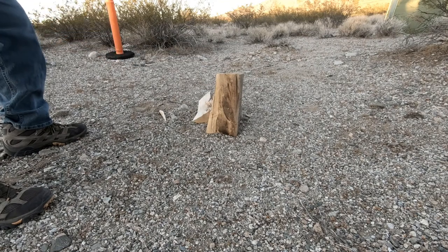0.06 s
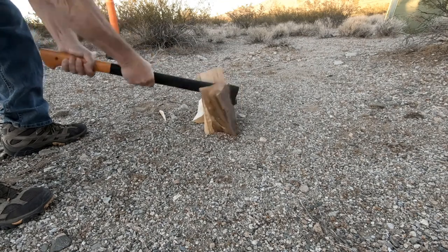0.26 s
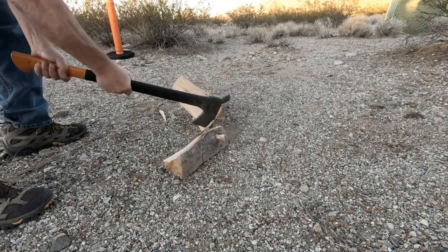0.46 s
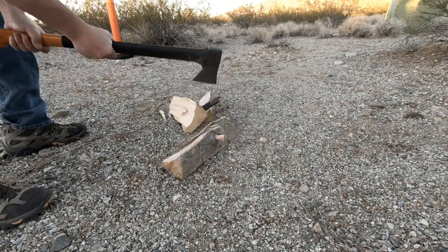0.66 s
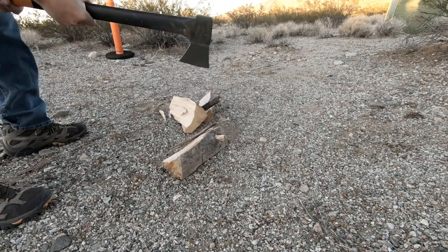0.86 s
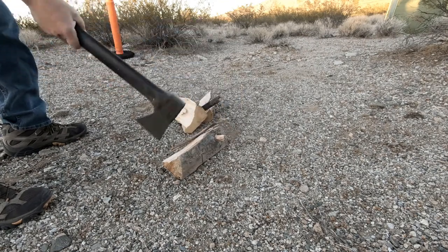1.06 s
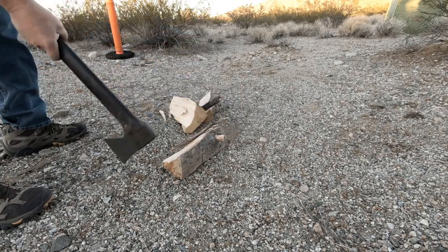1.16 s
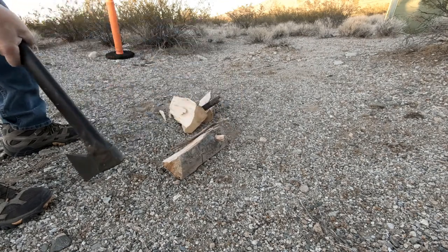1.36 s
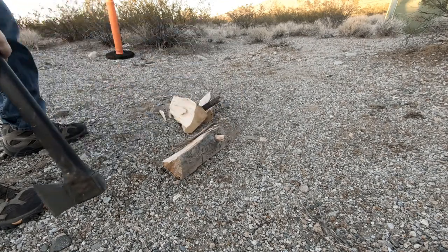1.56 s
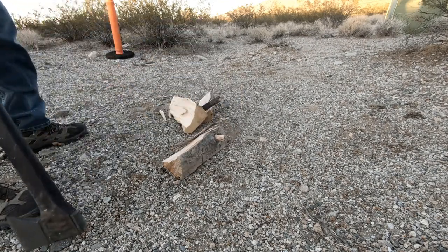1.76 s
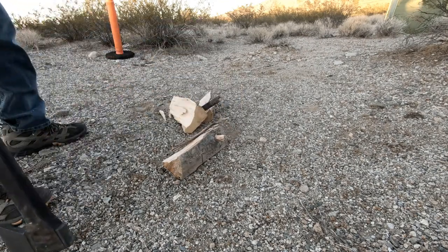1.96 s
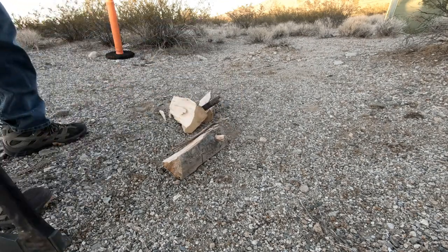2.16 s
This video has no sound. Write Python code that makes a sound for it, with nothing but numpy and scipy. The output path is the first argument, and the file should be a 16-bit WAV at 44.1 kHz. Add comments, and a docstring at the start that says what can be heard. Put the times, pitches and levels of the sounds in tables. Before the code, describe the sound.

An axe splits a short log with one loud sharp crack, and the halves clatter onto gravel

```python
"""An axe splits a short log on gravel: bursts of cracks excite log resonances, struck sines knock and ring.
The halves tumble and slide: bursts through wood resonances, hollow notes, grains and ticking stones.
The lowered handle knocks and the head clinks on a stone; shoes scuff, pebbles tick and cloth swishes.
Behind them are filtered-noise wind rumble, a faint hiss of air and one brief low hum.
"""
import sys
import numpy as np
from scipy import signal
from scipy.fft import rfft, irfft
from scipy.io import wavfile

SR = 44100
rng = np.random.default_rng(int(sys.argv[2]) if len(sys.argv) > 2 else 0)


def generate_wav(signal):
    """Clip the signal to [-1, 1] and save it as 16-bit WAV at the path in sys.argv[1]."""
    frames = np.transpose(np.atleast_2d(signal))
    scaled = np.clip(frames, -1, 1) * 32767
    pcm = np.round(scaled).astype(np.int16)
    wavfile.write(sys.argv[1], SR, pcm)


N = 97020
T = np.arange(N) / SR


def from_db(db):
    """Amplitude ratio of a level in dB."""
    return 10 ** (np.asarray(db) / 20)


def rms_one(x):
    """Scale to unit rms."""
    return x / np.sqrt(np.mean(x ** 2) + 1e-20)


def in_time(rows):
    """Gain curves, linear in dB between rows of (time [s], level [dB], ..)."""
    time_s, *columns_db = np.transpose(rows)
    return [from_db(np.interp(T, time_s, column_db)) for column_db in columns_db]


def response(points, size=8192):
    """Minimum-phase impulse response with a spectrum of (frequency [Hz], level [dB])."""
    hz, db = np.transpose(points)
    bins_hz = np.maximum(np.fft.rfftfreq(size, 1 / SR), 1)
    magnitude = from_db(np.interp(np.log(bins_hz), np.log(hz), db))
    cepstrum = irfft(np.log(magnitude))
    # fold the cepstrum to its causal half
    cepstrum[1:size // 2] *= 2
    cepstrum[size // 2 + 1:] = 0
    return irfft(np.exp(rfft(cepstrum)))[:size // 2]


def through(x, h):
    """Filter by an impulse response of unit energy, which keeps the power of white noise."""
    return signal.fftconvolve(x, h / np.linalg.norm(h))[:N]


def colour(x, points):
    """Shape the spectrum; it drops 21.5 dB in the octave below the first point."""
    hz, db = points[0]
    return through(x, response([(hz / 2, db - 21.5), *points]))


def resonate(x, peaks, size=4096):
    """Parallel damped modes of (frequency [Hz], width [Hz], relative level [dB]), alternating in sign."""
    t = T[:size]
    h = 0
    for k, (hz, width_hz, db) in enumerate(peaks):
        decay = np.exp(-np.pi * width_hz * t)
        h = h + (-1) ** k * from_db(db) * width_hz * decay * np.cos(2 * np.pi * hz * t)
    return through(x, h)


def decay_db(age_s, t60_s):
    """Level falling 60 dB per t60, down to -200 dB."""
    return -np.minimum(60 * age_s / t60_s, 200)


def ring(start_s, hz, t60_s, db):
    """A struck mode: a sine dying exponentially."""
    age_s = np.maximum(T - start_s, 0)
    return from_db(db + decay_db(age_s, t60_s)) * np.sin(2 * np.pi * hz * age_s)


def grains(grain_db):
    """Dense tiny clicks of random sign and uneven size; rms 1."""
    signs = rng.choice([-1, 1], N)
    return rms_one(signs * from_db(grain_db * np.minimum(rng.exponential(1, N), 6)))


def burst(start_s, db, length_s, t60_s, grain_db=2):
    """A crush of micro-fractures that holds for its length and dies."""
    age_s = np.maximum(T - start_s - length_s, 0)
    shape = (T >= start_s) * from_db(decay_db(age_s, t60_s))
    crush = shape * grains(grain_db)
    # energy is set by the shape, not by the draw
    return from_db(db) * crush * np.linalg.norm(shape) / np.linalg.norm(crush)


def drift(knots_per_s):
    """Random wander: straight lines between normal knots of spread 1."""
    knots = rng.standard_normal(2000)
    return np.interp(T * knots_per_s, np.arange(len(knots)), knots)


def snaps(rate_per_s):
    """Separate clicks at random moments; rms 1."""
    return rms_one((rng.random(N) < rate_per_s / SR) * rng.uniform(-1, 1, N))


STONES_PER_S, STONE_WIDTH_SHARE = 160, 0.094   # mode width as a share of its frequency


def stones(range_hz, count=10):
    """Stones of different sizes tick at random, each size with its own mode; rms 1."""
    ticks = 0
    for hz in np.geomspace(*range_hz, count):
        ticks = ticks + resonate(snaps(STONES_PER_S / count), [(hz, hz * STONE_WIDTH_SHARE, 0)])
    return rms_one(ticks)


def swell(start_s, length_s, first_hz, last_hz, width_hz, db):
    """A narrow noise band, two drifts on quadrature carriers, that rises, glides and fades."""
    along = np.clip((T - start_s) / length_s, 0, 1)
    phase = 2 * np.pi * np.cumsum(first_hz + (last_hz - first_hz) * along) / SR
    band = drift(width_hz) * np.cos(phase) + drift(width_hz) * np.sin(phase)
    return from_db(db) * np.sin(np.pi * along) * band


# wind spectrum: (frequency [Hz], relative level [dB])
WIND_COLOUR = [(25, -1.5), (70, -4.5), (150, -9.5), (600, -39.5)]
WIND_DB, WIND_GUST_DB, WIND_SIDE_DB = -54.5, -2, -3   # side: relative to mid


def wind():
    """Turbulence rumbles on the microphone: low-passed stereo noise with a drifting level."""
    rumble = stereo_noise(WIND_COLOUR, WIND_SIDE_DB)
    rumble = signal.sosfilt(signal.butter(2, 400, fs=SR, output="sos"), rumble)
    return from_db(WIND_DB + WIND_GUST_DB * drift(4.8)) * rumble


# open-air hiss spectrum: (frequency [Hz], relative level [dB])
AIR_COLOUR = [(300, -3), (650, -11), (15500, -27.5)]
AIR_DB, AIR_SIDE_DB = -67, -0.5


def air():
    """Faint steady hiss: coloured stereo noise."""
    return from_db(AIR_DB) * stereo_noise(AIR_COLOUR, AIR_SIDE_DB)


def stereo_noise(points, side_db):
    """Coloured mid noise plus independent side noise of opposite sign at each ear."""
    mid = colour(rng.standard_normal(N), points)
    side = colour(rng.standard_normal(N), points)
    return mid + from_db(side_db) * side * [[1], [-1]]


HUM_START_S, HUM_LENGTH_S, HUM_HZ, HUM_WIDTH_HZ, HUM_DB = 1.164, 0.18, 78, 24.04, -52


def hum():
    """A low narrow noise band swells briefly."""
    return swell(HUM_START_S, HUM_LENGTH_S, HUM_HZ, HUM_HZ, HUM_WIDTH_HZ, HUM_DB)


# sole scuffs: (time [s], length [s], first frequency [Hz], last frequency [Hz], level [dB])
SCUFFS = [(1.74, 0.084, 1478, 1418, -56), (1.78, 0.0587, 821, 599, -52.5)]
SCUFF_WIDTH_HZ = 180


def scuffs():
    """The sole scuffs: gliding narrow noise bands."""
    return sum(swell(start_s, length_s, first_hz, last_hz, SCUFF_WIDTH_HZ, db)
               for start_s, length_s, first_hz, last_hz, db in SCUFFS)


# pebbles shifting underfoot: (time [s], level [dB], frequency [Hz])
PEBBLES = [(1.4103, -47, 1367), (1.441, -53.5, 1002), (1.544, -48, 3698), (1.704, -52.5, 1502),
           (1.7725, -39, 1397)]
PEBBLE_WIDTH_HZ, PEBBLE_CLICK_DB, PEBBLE_BAND_HZ = 660, -10, (770, 5600)
UNDERFOOT_RANGE_HZ, UNDERFOOT_DB = (700, 3500), -5.5   # grinding stones, relative to the rubbing


def pebbles(rub):
    """Stones grind with the rubbing shoe; single pebbles tick, each with one broad mode."""
    ticking = from_db(UNDERFOOT_DB) * rub * stones(UNDERFOOT_RANGE_HZ)
    for start_s, db, hz in PEBBLES:
        tick = burst(start_s, db, length_s=0.00054, t60_s=0.014)
        ticking = ticking + from_db(PEBBLE_CLICK_DB) * tick + resonate(tick, [(hz, PEBBLE_WIDTH_HZ, 0)])
    return signal.sosfilt(signal.butter(2, PEBBLE_BAND_HZ, "band", fs=SR, output="sos"), ticking)


# shoes and clothes moving: (time [s], rubbing level [dB], swish level [dB])
MOVING = [(0, -76, -81), (.23, -68.5, -64.5), (.3, -81, -85), (1.17, -73.5, -71.5), (1.187, -56, -85),
          (1.24, -74.5, -70.5), (1.6, -73, -80), (1.79, -58.5, -69), (1.91, -61.5, -75), (2.04, -79, -67.5),
          (2.11, -66, -46), (2.16, -47.5, -47.5), (2.2, -57.5, -53)]
# rubbing spectrum: (frequency [Hz], relative level [dB])
RUB_COLOUR = [(100, -7), (750, .5), (1500, -2.5), (2500, -10.5), (15000, -43.5)]
# cloth spectrum: (frequency [Hz], relative level [dB])
SWISH_COLOUR = [(500, -27), (4500, 3), (11000, -8.5), (15500, -20)]


def stance():
    """A shoe rubs and scuffs, pebbles tick and cloth swishes: grains follow the motion."""
    rub, swish = in_time(MOVING)
    shoe = colour(rub * grains(3.6), RUB_COLOUR)
    cloth = colour(swish * grains(3.0), SWISH_COLOUR)
    return scuffs() + pebbles(rub) + shoe + cloth


# handle modes: (frequency [Hz], relative level [dB], t60 [s])
HANDLE = [(1875, -1.5, 0.17), (1990, -7, 0.15), (2390, 0.5, 0.067), (3544, -5, 0.086)]
# handle knock spectrum: (frequency [Hz], relative level [dB])
HANDLE_COLOUR = [(260, -10), (500, -8), (1400, -23.5), (1900, -9), (4200, -10), (12000, -52.5)]
HANDLE_START_S, HANDLE_LENGTH_S, HANDLE_DB, HANDLE_RING_DB = 1.3168, 0.0089, -39, -41


def handle_knock():
    """The hollow handle knocks: a coloured burst plus dying sines."""
    knock = colour(burst(HANDLE_START_S, HANDLE_DB, HANDLE_LENGTH_S, t60_s=0.046), HANDLE_COLOUR)
    for hz, db, t60_s in HANDLE:
        start_s = HANDLE_START_S + HANDLE_LENGTH_S * rng.random() / 2
        knock = knock + ring(start_s, hz, t60_s, HANDLE_RING_DB + db)
    return knock


# steel on stone: (time [s], level [dB])
CLINKS = [(1.8563, -32.5), (1.8722, -48)]
# contact spectrum: (frequency [Hz], relative level [dB])
CLINK_COLOUR = [(1700, -22), (2600, -1.5), (7000, 7.5), (9000, -11), (12500, -3.5), (15500, -33)]
# axe head modes: (frequency [Hz], level relative to the clink [dB], t60 [s])
HEAD = [(2394, -12.5, 0.1), (6140, -13, .22), (6710, -19, .22), (7880, 4.5, 0.046), (10530, -7.5, 0.048),
        (12740, -11, 0.05)]
CLINK_TAIL_DB, CLINK_TAIL_T60_S = -13.5, 0.21


def head_clinks():
    """The head clinks on a stone and bounces once: coloured ticks excite steel modes."""
    ticks, modes = 0, 0
    for start_s, db in CLINKS:
        ticks = ticks + burst(start_s, db, length_s=0.0028, t60_s=0.023, grain_db=5)
        ticks = ticks + burst(start_s, db + CLINK_TAIL_DB, 0, CLINK_TAIL_T60_S)
        modes = modes + sum(ring(start_s, hz, t60_s, db + mode_db) for hz, mode_db, t60_s in HEAD)
    return colour(ticks, CLINK_COLOUR) + modes


# halves hitting gravel:
# (time [s], clack level [dB], length [s], grit level [dB], hollow note [Hz], note level [dB])
LANDINGS = [(0.4323, -20.5, .0055, -27.5, 268, -34.5), (0.4707, -37.5, 0.0042, -48, 1630, -34),
            (.512, -41.5, .004, -66.5, 1640, -39.5), (0.5432, -36.5, 0.0033, -43, 1060, -46),
            (0.5955, -30.5, 0.0037, -31, 1150, -22.5), (0.639, -43.5, .003, -67, 1150, -35),
            (.694, -40, 0.0045, -38.5, 1146, -34.5), (0.7138, -42, 0.0049, -45, 642, -28.5)]
# split-half resonances: (frequency [Hz], width [Hz], relative level [dB])
HALF = [(1280, 200, -5.5), (1780, 250, 0.5), (2210, 320, -1.5), (3010, 355, 1.5), (3460, 220, 2),
        (4515, 290, -1.5), (6220, 250, -5.5), (7870, 300, -10.5)]
# ground thud spectrum: (frequency [Hz], relative level [dB])
THUD_COLOUR = [(180, 1), (450, 1), (2000, -12), (8000, -51)]
# crunched and sliding grit spectrum: (frequency [Hz], relative level [dB])
GRIT_COLOUR = [(300, -22.5), (2500, -2.5), (5500, 2), (12000, -11), (15500, -20)]
LANDING_T60_S, NOTE_T60_S, THUD_T60_S = 0.027, 0.028, 0.075
OVERTONE_DB, THUD_DB = -6.5, -19.5   # relative to the note


def landings():
    """The halves clack through wood modes, sound hollow notes, thud on the ground and crunch grit."""
    clacks, grit, notes, thuds = 0, 0, 0, 0
    for start_s, db, length_s, grit_db, hz, note_db in LANDINGS:
        clacks = clacks + burst(start_s, db, length_s, LANDING_T60_S)
        grit = grit + burst(start_s + length_s / 2, grit_db, length_s / 2, LANDING_T60_S)
        notes = notes + ring(start_s, hz, NOTE_T60_S, note_db)
        notes = notes + ring(start_s, 2 * hz, NOTE_T60_S, note_db + OVERTONE_DB)
        thuds = thuds + burst(start_s, note_db + THUD_DB, length_s, THUD_T60_S)
    return resonate(clacks, HALF) + notes + colour(thuds, THUD_COLOUR) + colour(grit, GRIT_COLOUR)


# sliding on gravel: (time [s], wood scrape level [dB], grit level [dB])
SLIDE = [(.35, -85, -81), (.39, -58, -58.5), (.43, -51.5, -60.5), (.455, -42, -51.5), (.535, -44.5, -60),
         (.565, -59, -58), (.59, -51.5, -62), (.62, -48.5, -60.5), (.68, -45.5, -48.5), (.73, -52.5, -55.5),
         (.77, -64.5, -62.5), (.82, -73.5, -70), (1.0, -75.5, -66.5), (1.15, -86.5, -83.5)]
# wood scrape spectrum: (frequency [Hz], relative level [dB])
SCRAPE_COLOUR = [(200, -24.5), (800, -21.5), (1150, -8.5), (1700, 1), (3200, -4), (5000, -18.5),
                 (9000, -29)]
SLIDE_GRAIN_DB, SLIDE_ROUGH_DB, SLIDE_ROUGH_PER_S = 4.5, 4.5, 220
FLICKED_RANGE_HZ, FLICKED_DB = (1410, 8000), -2   # flicked stones, relative to the grit


def slide():
    """Wood scrapes and grit crunches as rough grains; single stones are flicked."""
    scrape_gain, grit_gain = in_time(SLIDE)
    scrape = scrape_gain * grains(SLIDE_GRAIN_DB) * from_db(SLIDE_ROUGH_DB * drift(SLIDE_ROUGH_PER_S))
    grit = grit_gain * grains(SLIDE_GRAIN_DB) * from_db(SLIDE_ROUGH_DB * drift(SLIDE_ROUGH_PER_S))
    flick_gain = grit_gain * from_db(FLICKED_DB + SLIDE_ROUGH_DB * drift(STONES_PER_S / 2))
    flicked = flick_gain * stones(FLICKED_RANGE_HZ)
    return flicked + colour(scrape, SCRAPE_COLOUR) + colour(grit, GRIT_COLOUR)


# splinters and chips snapping: (time [s], level [dB])
SPLINTERS = [(.2793, -25), (0.286, -30), (.3, -46), (0.316, -38.5), (.336, -38.5), (.376, -44.5),
             (0.4896, -37.5), (.5695, -40), (0.581, -49), (0.625, -49), (.672, -53), (.848, -47)]
# splinter spectrum: (frequency [Hz], relative level [dB])
SPLINTER_COLOUR = [(600, -20.5), (3200, -7.5), (4800, 0), (9000, -4.5), (15500, -13.5)]
SPLINTER_LENGTH_S, SPLINTER_T60_S = 0.0017, 0.022


def splinters():
    """Splinters snap: short coloured bursts."""
    bursts = sum(burst(start_s, db, SPLINTER_LENGTH_S, SPLINTER_T60_S) for start_s, db in SPLINTERS)
    return colour(bursts, SPLINTER_COLOUR)


# whole log knocking under the blade: (time [s], frequency [Hz], t60 [s], level [dB])
BLOWS = [(.2442, 1055, 0.022, -1), (.2445, 590, .02, -10.5), (.2438, 260, 0.044, -22),
         (.2525, 128, .028, -7), (.254, 102, 0.12, -36)]
THUMP_LOW_CUT_HZ = 29


def log_knock():
    """Log and ground thump under the blade: high-passed dying sines."""
    low_cut = signal.butter(2, THUMP_LOW_CUT_HZ, "high", fs=SR, output="sos")
    return signal.sosfilt(low_cut, sum(ring(*row) for row in BLOWS))


# wood cracking open: (time [s], level [dB], length [s])
CRACKS = [(0.242, -9, 0.0039), (0.2444, -4.5, 0.0063), (0.254, -12, .0013), (0.2608, -10, 0.001),
          (0.266, -15.5, 0.0056), (0.2727, -10, 0.0014)]
# torn wood spectrum: (frequency [Hz], relative level [dB])
CRACK_COLOUR = [(300, -14.5), (1250, -10.5), (1500, -0.5), (3200, -2), (10000, -7), (15500, -20.5)]
# log resonances: (frequency [Hz], width [Hz], relative level [dB])
LOG = [(1478, 62, -3.5), (3005, 230, 3.5), (4580, 140, -3.5), (6090, 190, 1), (7870, 260, -8),
       (10060, 130, -9.5), (13300, 240, -12.5)]
CRACK_T60_S, CRACK_GRAIN_DB, LOG_DB, TEAR_DB = 0.015, 2, -4, -2.5
FIBRES_START_S, FIBRES_PER_S, FIBRES_DB, FIBRES_T60_S = 0.276, 400, -26, 0.13


def tearing_wood():
    """Cracks, then the last fibres parting one by one, drive log modes and a broad tear."""
    cracks = sum(burst(start_s, db, length_s, CRACK_T60_S, CRACK_GRAIN_DB)
                 for start_s, db, length_s in CRACKS)
    fade = from_db(FIBRES_DB - 60 * np.abs(T - FIBRES_START_S) / FIBRES_T60_S)
    fibres = snaps(FIBRES_PER_S) * (T >= FIBRES_START_S) * fade
    fracture = cracks + fibres
    return from_db(LOG_DB) * resonate(fracture, LOG) + from_db(TEAR_DB) * colour(fracture, CRACK_COLOUR)


# axe modes: (frequency [Hz], level [dB], t60 [s])
AXE = [(676, -34.5, 0.22), (1450, -24.5, 0.092), (1604, -26.5, 0.064), (2140, -28, 0.12),
       (2380, -26.5, 0.086), (2836, -22.5, 0.096), (2990, -26, .1), (3211, -24.5, 0.11), (3330, -27.5, .13),
       (4670, -29, 0.17), (6300, -27, 0.11), (7990, -31.5, .07)]


def axe_ring():
    """Axe modes start at random moments within the second crack and die away."""
    bite_s, _, bite_length_s = CRACKS[1]
    return sum(ring(bite_s + bite_length_s * rng.random(), hz, t60_s, db) for hz, db, t60_s in AXE)


def chop():
    """The blade tears through the log; log and axe ring, and splinters snap."""
    return tearing_wood() + log_knock() + axe_ring() + splinters()


SCATTER_DB, SCATTER_T60_S, FAR_DB, FAR_T60_S = -16.5, 0.11, -44, 0.7
FIRST_ECHO_S, FAR_CUTOFF_HZ = 0.0074, 4000


def outdoors(x):
    """Quick scatter off gravel and scrub, and a faint dull far tail that differs at each ear."""
    t = T[:SR]

    def tail(t60_s):
        fade_in = np.clip(t / FIRST_ECHO_S - 1, 0, 1)
        return through(x, rng.standard_normal(SR) * from_db(-60 * t / t60_s) * fade_in)

    near = from_db(SCATTER_DB) * tail(SCATTER_T60_S)
    far = from_db(FAR_DB) * np.array([tail(FAR_T60_S), tail(FAR_T60_S)])
    return x + near + signal.sosfilt(signal.butter(1, FAR_CUTOFF_HZ, fs=SR, output="sos"), far)


def scene():
    """All sources with outdoor echoes, over the background."""
    background = wind() + hum() + air()
    halves = landings() + slide()
    lowered_axe = handle_knock() + head_clinks()
    return outdoors(stance() + lowered_axe + halves + chop()) + background


# stereo balance: (frequency [Hz], left minus right [dB])
LEFT_BIAS = [(25, 7.5), (90, 15.5), (380, 10), (1200, -1.5), (4400, -0.23)]
CASE_ECHO_S, CASE_ECHO_HZ, CASE_ECHO_DB = 0.00048, 8218, -6.5
CLIP_LEVEL, CUTOFF_HZ = 0.92, 15900


def record(dry):
    """The left takes more bass, the case reflects treble in opposite signs, peaks clip, the top is cut."""
    ears = []
    treble_filter = signal.butter(3, CASE_ECHO_HZ, "high", fs=SR, output="sos")
    for x, sign in zip(dry, (1, -1)):
        # the two ears' gains sum to 2
        tilt = [(hz, 20 * np.log10(2 / (1 + from_db(-sign * db)))) for hz, db in LEFT_BIAS]
        treble = signal.sosfilt(treble_filter, x)
        echo = from_db(CASE_ECHO_DB) * np.interp(T - CASE_ECHO_S, T, treble)
        ears.append(signal.fftconvolve(x + sign * echo, response(tilt))[:N])
    clipped = np.clip(ears, -CLIP_LEVEL, CLIP_LEVEL)
    return signal.sosfilt(signal.ellip(10, 0.1, 80, CUTOFF_HZ, fs=SR, output="sos"), clipped)


dry = scene()
out = record(dry)
generate_wav(out)
```